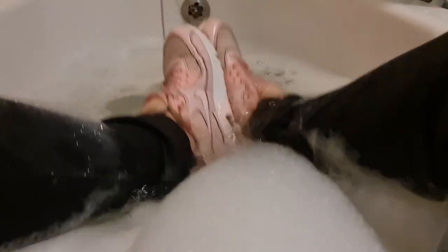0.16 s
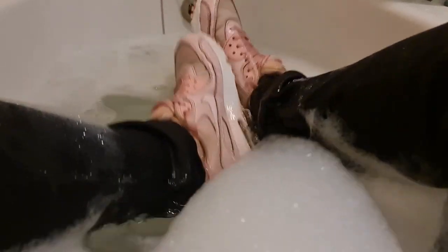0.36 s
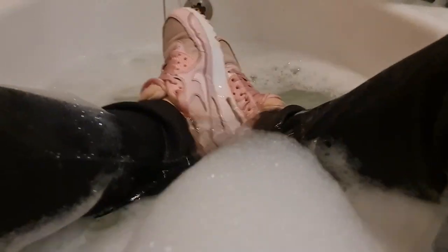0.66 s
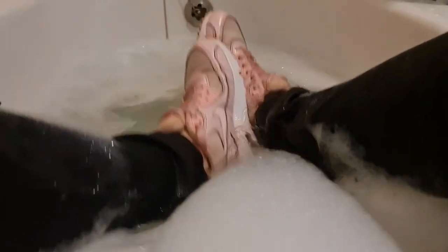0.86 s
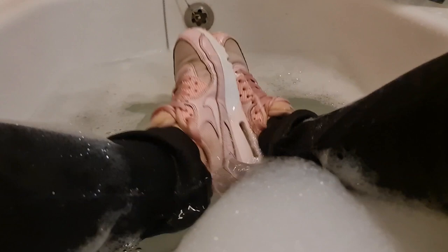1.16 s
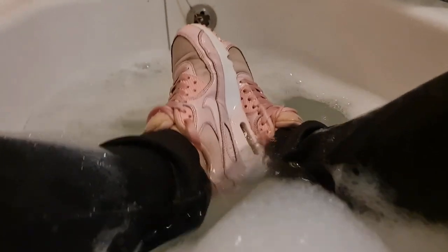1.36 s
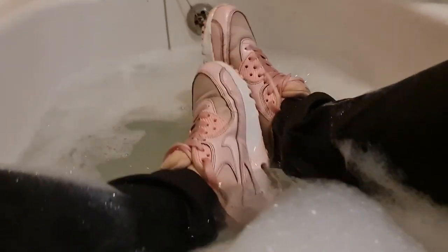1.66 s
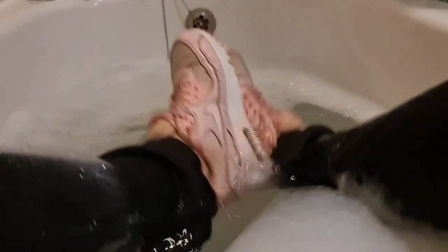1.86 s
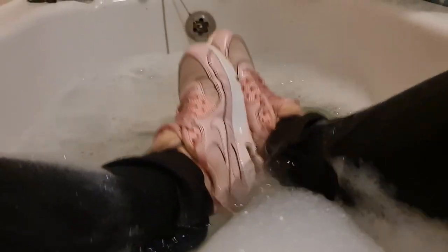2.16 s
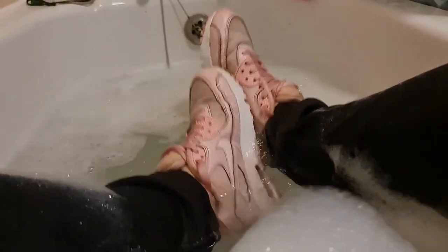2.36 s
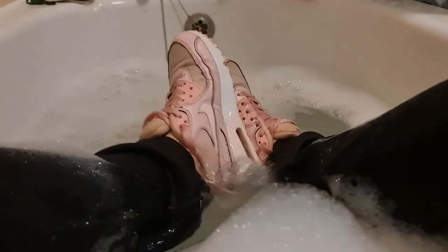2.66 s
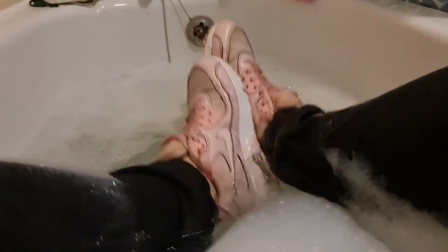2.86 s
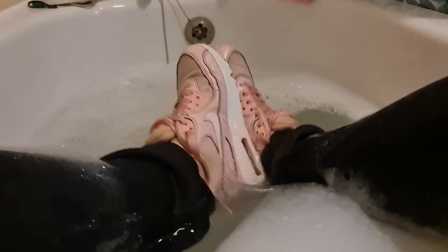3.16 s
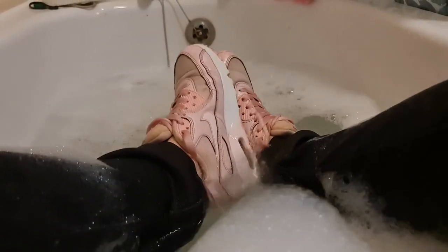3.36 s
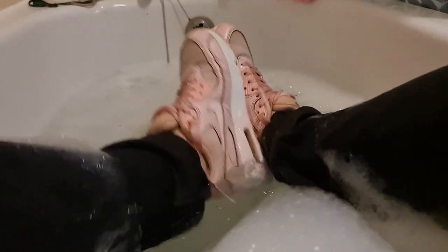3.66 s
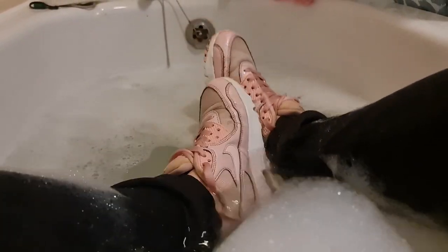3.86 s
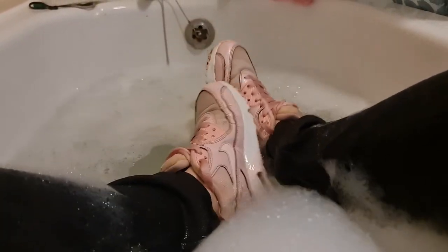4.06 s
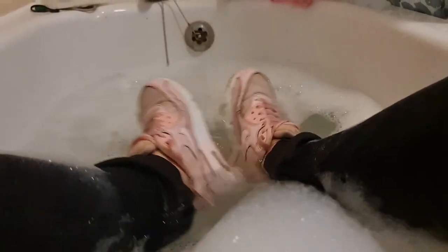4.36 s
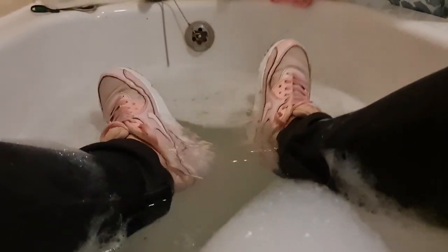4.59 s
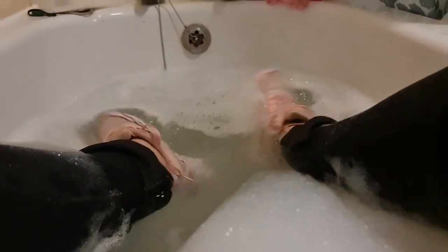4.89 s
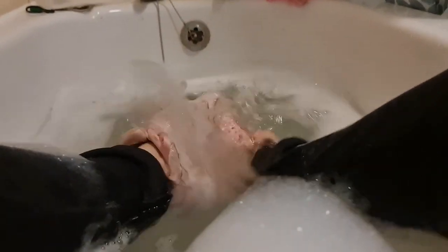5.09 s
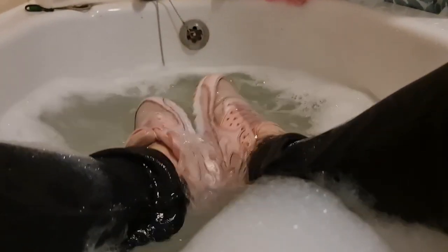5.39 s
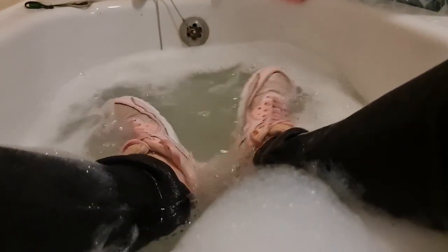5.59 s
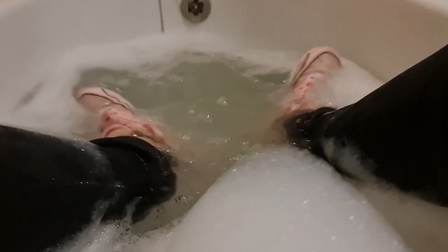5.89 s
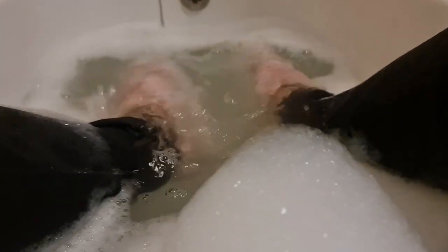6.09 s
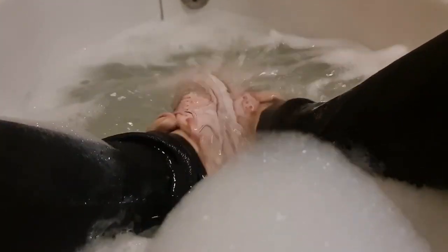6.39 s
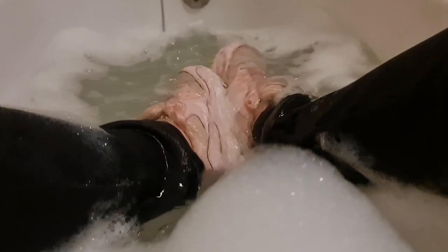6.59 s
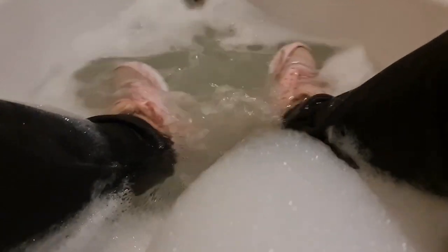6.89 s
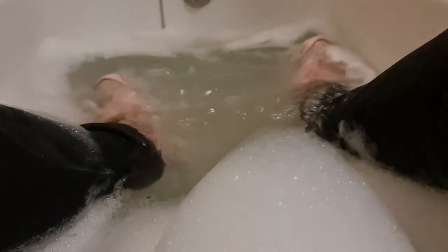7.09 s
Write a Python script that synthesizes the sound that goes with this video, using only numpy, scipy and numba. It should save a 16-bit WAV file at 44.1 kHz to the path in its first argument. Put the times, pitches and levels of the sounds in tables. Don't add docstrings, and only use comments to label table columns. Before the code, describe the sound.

Close up in a small tiled bathroom, wet rubber soles rub together in brief strokes, giving quick chirpy squeaks, gritty rubbing and fizzing foam over faint lapping. The squeaks fade after four seconds. After a near-quiet gap, feet push through the bathwater twice, with splashes, gurgling bubbles, crackling spray and dull low tub knocks. A nearby phone picks up a bright, slightly echoing sound with faint low rumble.

```python
import sys
import numpy as np
from scipy import signal
from scipy.fft import rfft, irfft, next_fast_len
from scipy.io import wavfile
from scipy.ndimage import uniform_filter1d
from numba import njit

SR = 44100
rng = np.random.default_rng(int(sys.argv[2]) if len(sys.argv) > 2 else 0)


def to_linear_factor(level_db):
    exponent = np.asarray(level_db, float) / 20
    return 10 ** exponent


def wrap_up_sound(samples):
    columns = np.atleast_2d(samples).T
    tamed = np.clip(columns, -1, 1)
    steps = np.round(tamed * 32767).astype(np.int16)
    wavfile.write(sys.argv[1], SR, steps)


N = 319284


def unit(x):
    return x / np.sqrt(np.mean(x ** 2))


def colour(x, points):
    hz, db = np.transpose(points)
    size = next_fast_len(x.shape[-1])
    f = np.maximum(np.arange(size // 2 + 1) * SR / size, 1)
    gain = to_linear_factor(np.interp(np.log(f), np.log(hz), db))
    return irfft(rfft(x, size) * gain, size)[..., :x.shape[-1]]


def walk(rate, size):
    hold = max(int(SR / rate), 2)
    levels = np.repeat(rng.standard_normal(size // hold + 1), hold)
    return 1.226 * uniform_filter1d(levels, hold)[:size]


@njit
def add_bubbles(out, start, hz, turns, size, glide, sr):
    for k in range(len(start)):
        fade = np.exp(-hz[k] / sr / turns[k])
        step = 2 * np.pi * hz[k] / sr
        phase = 0.
        level = size[k]
        count = int(6 * turns[k] * sr / hz[k])
        rise = (1 + glide) ** (2 / count)
        for i in range(start[k], min(start[k] + count, len(out))):
            out[i] += level * np.sin(phase)
            phase += step
            step = min(step * rise, 2.8)
            level *= fade


def swarm(rate, lo_hz, hi_hz, turns, spread_db, glide):
    when, pitch, bigness, ring = rng.random((int(rate * N / SR), 4)).T
    out = np.zeros(N)
    hz = lo_hz * (hi_hz / lo_hz) ** pitch
    size = to_linear_factor(-spread_db * np.log(1.02 - bigness)) * np.sqrt(hz / lo_hz)
    add_bubbles(out, (when * N).astype(np.int64), hz, turns * (.5 + ring), size, glide, 1. * SR)
    return unit(out)


def efforts(start, length, db, swell_db, attack, release):
    t = np.arange(0, N, 20)[:, None] / SR
    u = np.clip((t - start) / length, 0, 1)
    creep = np.minimum(t - start - attack, 0) / attack
    dying = np.maximum(t - start - length, 0) / release
    shape = np.exp(creep - dying)
    power = np.sum((shape * to_linear_factor(db - swell_db * (1 - u))) ** 2, axis=1)
    return np.interp(np.arange(N) / SR, t[:, 0], np.sqrt(power))


# start in seconds, length in seconds, last pitch in Hz,
# fundamental level in dB, second partial level in dB.
DIVES = [
    (.119, 0.014, 958, -32, -35.5),
    (.44, 0.027, 1420, -48, -52),
    (.611, .016, 1728, -44, -25),
    (.682, 0.011, 1418, -22, -30.5),
    (1.238, 0.04, 2250, -45, -43),
    (2.017, 0.015, 3280, -26.5, -42.5),
    (2.056, .011, 3190, -27.5, -50.5),
    (2.081, 0.008, 2040, -26.5, -27.5),
    (3.306, 0.033, 1356, -22.5, -35),
]
# the same five columns, in s, s, Hz, dB, dB.
SAGS = [(0, 0.0084, 1988, -23, -24), (.025, 0.024, 1740, -38, -31), (.05, 0.035, 1830, -38.5, -36.5),
        (.99, 0.055, 1604, -53, -86), (2.736, 0.017, 1790, -40, -37), (1.325, .045, 4130, -49, -73),
        (1.045, 0.025, 2700, -45.5, -46.5), (1.281, 0.063, 2163, -45.5, -43.5),
        (1.308, 0.049, 1618, -44.5, -62), (2.327, 0.011, 1455, -16.5, -32),
        (2.584, 0.018, 3000, -43.5, -33), (2.635, 0.015, 3756, -18.5, -43), (2.731, 0.012, 1358, -43, -30),
        (2.737, 0.01, 760, -31.5, -34.5), (3.05, 0.028, 1487, -54.5, -57), (3.95, 0.031, 1395, -48, -51),
        (1.262, .035, 2150, -44, -35.5), (1.275, .05, 2400, -41, -60)]
# the same five columns, in s, s, Hz,
# dB, dB.
HELD = [(.405, .013, 2305, -42.5, -58), (.624, 0.028, 1760, -37.5, -24.5), (.625, 0.053, 5400, -35, -56),
        (.702, 0.018, 1500, -32, -30.5), (1.058, 0.015, 2155, -49, -39.5), (1.938, 0.016, 2080, -43, -40.5),
        (1.954, 0.027, 1716, -35.5, -62), (1.695, 0.022, 1600, -50, -65),
        (1.702, 0.028, 2207, -44.5, -54.5), (1.738, 0.022, 3750, -47.5, -64),
        (1.945, 0.039, 6490, -34.5, -57.5), (2.0, 0.019, 2130, -59.5, -30.5),
        (2.064, 0.019, 1731, -63, -25), (2.055, .025, 5300, -32, -51.5), (2.305, 0.013, 2120, -35, -39),
        (2.357, 0.014, 1460, -22.5, -28), (2.374, .018, 1500, -34.5, -32), (2.606, 0.083, 2526, -40, -40.5),
        (2.646, 0.02, 1864, -27, -38.5), (2.656, 0.0076, 3850, -17.5, -45.5),
        (2.671, 0.016, 2480, -34, -34), (2.708, 0.022, 2700, -36, -42), (3.204, 0.026, 1500, -39.5, -66),
        (3.217, 0.033, 1112, -39.5, -51), (3.272, 0.028, 3850, -38, -45.5),
        (3.279, 0.0053, 2930, -34.5, -38.5), (3.29, .025, 5750, -31.5, -61), (3.364, 0.018, 2200, -36, -47),
        (3.937, .055, 4950, -49, -66.5), (3.286, 0.038, 1900, -27.5, -27), (3.916, 0.042, 2455, -50.5, -44),
        (4.28, 0.12, 5820, -67, -94),
        (0.656, 0.0246, 1770, -37, -27.5), (0.636, 0.039, 4290, -30, -60), (.7, 0.037, 4585, -33.5, -60),
          (0.689, 0.037, 5910, -41, -60), (2.662, 0.034, 3700, -27, -60), (4.78, 0.042, 1390, -67, -85),
          (2.375, .04, 2960, -34, -56), (.59, 0.013, 4500, -47, -70), (.602, 0.0072, 3500, -44, -68),
          (0.637, .008, 2500, -30.5, -60), (0.719, .03, 1500, -34, -35), (.76, .035, 4684, -54, -69.5),
          (1.082, 0.024, 1527, -51, -65), (1.742, .02, 2900, -54, -65), (1.813, 0.011, 3660, -48.5, -64),
          (1.938, .03, 3500, -47.5, -57), (1.959, 0.022, 5090, -41.5, -60), (2.265, .03, 1500, -54, -62),
          (2.399, 0.1, 718, -55.5, -69.5), (2.593, .03, 6270, -38, -60), (2.599, 0.028, 5275, -41, -63),
          (3.275, .03, 4750, -43.5, -65.5), (3.341, .03, 1390, -36.5, -37), (3.818, 0.046, 1560, -61, -74),
          (3.858, 0.0115, 1683, -42.5, -66), (3.88, 0.0288, 2435, -41.5, -43.5)]
# the same five columns, in s, s, Hz, dB, dB.
RISES = [(.291, 0.074, 1610, -51, -60), (.334, 0.014, 2300, -37.5, -53), (.35, 0.03, 2504, -42.5, -53.5),
         (.505, 0.0027, 3000, -33, -62), (.534, 0.025, 1746, -50, -48.5), (1.794, 0.027, 1530, -51, -58),
         (1.805, 0.017, 1916, -46, -50.5), (2.098, 0.012, 1483, -53, -30), (2.333, .007, 1914, -28, -33.5),
         (2.363, .009, 1882, -26, -36.5), (1.966, 0.0096, 2685, -42, -59.5),
         (3.222, .025, 2640, -40.5, -55), (3.352, 0.011, 2200, -32.5, -33),
         (2.946, 0.016, 2857, -43.5, -50), (3.088, 0.0082, 2165, -46.5, -57),
         (3.863, .018, 2457, -39.5, -38.5), (3.928, .008, 5140, -47, -62.5), (3.935, .008, 5840, -43, -65),
         (3.995, 0.016, 2940, -56, -70)]
# start in seconds, end in seconds.
FRAYED = ((.28, .56), (.98, 1.2), (1.69, 1.9), (2.26, 2.3), (2.58, 2.63), (2.37, 2.39), (2.658, 2.73),
           (3.94, 3.96))
DIVE, SAG, HOLD, RISE = 1.38, 1.13, 1, .84
SMEAR_RAD, WOBBLE, FRAYED_WOBBLE = .5, .022, .06
PARTIAL_FALL_DB, ROUGH_DB = -8, 3.5


def squeaks():
    out = np.zeros(N + SR)
    wobble, rough, uneven = walk(350, N + SR), walk(400, N + SR), walk(1500, N + SR)
    k = np.arange(1, 9)[:, None]
    for rows, glide in (DIVES, DIVE), (SAGS, SAG), (HELD, HOLD), (RISES, RISE):
        for s, length, last_hz, db, second_db in rows:
            i = int(max(s, 0) * SR)
            u = np.linspace(0, 1, max(int(length * SR), 16))
            now = slice(i, i + len(u))
            frayed = any(a < s < b for a, b in FRAYED)
            waver = FRAYED_WOBBLE if frayed else WOBBLE
            hz = last_hz * (1 + (glide - 1) * (1 - u) ** 1.6) * (1 + waver * wobble[now])
            smear = SMEAR_RAD * np.maximum(k - 1.6, 0) * uneven[now]
            phase = k * 2 * np.pi * np.cumsum(hz) / SR + smear
            partial_db = np.where(k == 1, db, second_db + PARTIAL_FALL_DB * (k - 2))
            gain = to_linear_factor(partial_db) * (k * hz < .45 * SR)
            shape = np.minimum(1, 5 * np.minimum(u, 1 - u)) * to_linear_factor(ROUGH_DB * rough[now])
            out[now] += 2 * shape * np.sum(gain * np.sin(phase), axis=0)
    return out[:N]


# start in seconds, length in seconds, slip level at the end in dB,
# swell over the stroke in dB, foam level in dB.
STROKES = [(-.01, 0.046, -30.5, -2, -36.5), (0.206, 0.16, -52.5, 8, -59), (0.377, 0.047, -50, 0.5, -50),
           (0.556, 0.036, -43, 11, -53), (0.621, 0.1, -32.5, 0, -39), (0.787, 0.028, -56, 12.5, -44.5),
           (0.87, 0.18, -52, 13, -86), (0.984, 0.11, -48.5, 14, -53.5), (1.228, 0.097, -41.5, 3.5, -46.5),
           (1.694, 0.14, -47.5, 4.5, -60.5), (1.942, 0.066, -33.5, 2, -34.5), (2.004, 0.088, -35.5, 1, -41),
           (2.318, 0.039, -25.5, 4, -34), (2.577, 0.093, -30, 5, -34.5), (2.645, 0.092, -26, 6.5, -37.5),
           (2.947, 0.033, -44.5, 1, -52), (3.021, 0.077, -40.5, 2, -45), (3.212, 0.068, -33.5, 1.5, -37),
           (3.283, 0.066, -27, 8.5, -40), (3.811, 0.066, -52, 15, -75.5), (3.861, 0.028, -50.5, 1, -47.5),
           (3.918, 0.023, -36, 4.5, -45), (4.3, 0.35, -76, -3.5, -93), (4.608, 0.061, -68, 6, -79)]
# frequency in Hz, level in dB per Hz.
RUB_COLOUR = [(600, -53.5), (1200, -4), (1600, 0), (2300, 1.5), (3800, 2), (6500, 10), (9000, 2.5),
              (14000, -6)]


def rubbing():
    s, length, slip_db, swell_db, foam_db = np.transpose(STROKES)
    slips = swarm(rate=1100, lo_hz=3000, hi_hz=7660, turns=9.5, spread_db=7.0, glide=-0.18)
    grit = swarm(rate=5000, lo_hz=1500, hi_hz=8350, turns=2.2, spread_db=10.0, glide=0.093)
    foam = swarm(rate=2600, lo_hz=8700, hi_hz=15800, turns=12.0, spread_db=7.5, glide=0.056)
    rub = to_linear_factor(-3.5) * slips + to_linear_factor(3.0) * unit(colour(grit, RUB_COLOUR))
    rub_press = efforts(s, length, slip_db, swell_db, attack=0.01, release=0.005)
    foam_press = efforts(s, length, foam_db, 1, attack=0.01, release=0.005)
    stutter = to_linear_factor(2 * (walk(110, N) - 0.24))
    return stutter * (rub_press * rub + foam_press * foam)


# start in seconds, length in seconds,
# slosh level in dB, splash level in dB, spray level in dB.
SURGES = [(4.923, 0.012, -68, -86, -53), (5.039, 0.1, -63, -61, -66.5), (5.146, 0.068, -53, -50.5, -59),
          (5.208, 0.05, -30.5, -35, -39.5), (5.276, 0.1, -40.5, -42, -50), (5.4, 0.055, -37.5, -42, -47.5),
          (5.496, 0.016, -37.5, -31, -35.5), (5.623, 0.038, -83, -44, -49.5),
          (5.789, 0.013, -56, -46, -55.5), (5.694, 0.053, -55.5, -53.5, -59),
          (5.851, 0.02, -51.5, -47, -60), (5.943, .14, -62.5, -66, -70.5), (6.09, 0.22, -51, -68.5, -71.5),
          (6.281, 0.04, -57, -50, -58), (6.299, 0.042, -59, -39, -49.5), (6.35, 0.088, -35, -33, -36),
          (6.357, 0.025, -57, -50, -35.5), (6.487, 0.13, -45, -39, -46.5), (6.61, 0.045, -34.5, -36, -37.5),
          (6.772, 0.023, -59, -33.5, -41), (6.853, 0.061, -50, -46.5, -50.5),
          (6.927, 0.11, -57, -42.5, -44.5), (7.106, 0.04, -44.5, -47, -46.5)]
# time in seconds, level in dB.
LAPPING = [(0.0, -46.5), (0.25, -60), (0.4, -49.5), (0.72, -75.5), (1.02, -53.5), (1.15, -61),
           (1.74, -57.5), (2.38, -64.5), (3.08, -57), (3.299, -75.5), (3.8, -65), (4.009, -58.5),
           (4.271, -66), (4.439, -59.5), (4.69, -66.5), (4.999, -66.5)]


def sweeps():
    s, length, slosh_db, splash_db, spray_db = np.transpose(SURGES)

    def push(db):
        return efforts(s, length, db, swell_db=0.5, attack=0.0064, release=0.027)

    slosh = swarm(rate=350, lo_hz=290, hi_hz=1300, turns=3.5, spread_db=4, glide=0.28)
    splash = swarm(rate=1300, lo_hz=1080, hi_hz=4100, turns=1.8, spread_db=6, glide=0.28)
    spray = swarm(rate=3500, lo_hz=3800, hi_hz=7200, turns=2, spread_db=6, glide=.15)
    mist = swarm(rate=4100, lo_hz=6950, hi_hz=16000, turns=0.5, spread_db=11.0, glide=0.029)
    lapping = to_linear_factor(np.interp(np.arange(N) / SR, *np.transpose(LAPPING), right=-120))
    surge = push(slosh_db) + lapping
    spatter = to_linear_factor(2.5 * (walk(120, N) - 0.28))
    thrown = push(splash_db) * splash + push(spray_db) * (spray + to_linear_factor(-5.5) * mist)
    return surge * slosh + spatter * thrown


# start in seconds, peak level in dB, pitch in Hz.
GURGLES = [(5.134, -41.5, 2600), (5.245, -24, 1004), (5.292, -29, 1426), (5.329, -34.5, 1270),
           (5.359, -30, 554), (5.428, -29.5, 1970), (5.454, -23.5, 1450), (5.473, -27.5, 1796),
           (5.989, -46, 1110), (6.356, -32, 1260), (6.383, -22, 2560), (6.41, -26, 2690), (6.429, -33, 610),
           (6.47, -27, 2440), (6.521, -28, 1010), (6.545, -38, 3080), (6.589, -26, 640),
           (6.645, -23.5, 924), (6.668, -32, 560), (6.702, -32, 1220), (6.809, -26, 1975),
           (6.858, -31.5, 1430), (6.901, -38, 2780)]
# start in seconds, peak level in dB, pitch in Hz.
BURBLES = [(1.61, -50, 1105), (5.193, -37, 2260), (5.22, -33, 453), (5.255, -36, 700), (5.403, -35, 2840),
           (5.415, -38, 2870), (5.545, -35, 3300), (5.658, -34.5, 790), (5.664, -40, 3180),
           (5.676, -34, 1180), (5.717, -37, 955), (5.719, -33, 1294), (5.755, -41, 1340),
           (5.772, -43, 1910), (5.796, -28.5, 758), (6.287, -46, 1290), (6.373, -34, 1320),
           (6.366, -19, 5330), (6.376, -24, 5550), (6.384, -31, 5080), (6.393, -28.5, 5550),
           (6.402, -26, 616), (6.44, -33, 694), (6.508, -39, 1080), (6.535, -38, 1104), (6.571, -33, 1110),
           (6.6, -32, 706), (6.635, -28, 800), (6.645, -32, 3270), (6.755, -36, 1940), (6.868, -39, 1610),
           (6.883, -48, 3800), (6.997, -48, 1310), (7.035, -44, 1120), (7.075, -39, 2100),
           (7.157, -44, 500), (7.185, -45, 2430)]
GURGLE_RING_S, BURBLE_RING_S, GURGLE_GLIDE = 0.0028, 0.0047, .13


def gurgles():
    out = np.zeros(N)
    for rows, ring in (GURGLES, GURGLE_RING_S), (BURBLES, BURBLE_RING_S):
        s, db, hz = np.transpose(rows)
        start, turns = (s * SR).astype(np.int64), 1 + hz * ring
        add_bubbles(out, start, hz, turns, to_linear_factor(db + 7), GURGLE_GLIDE, 1. * SR)
        short_glide = (1 + GURGLE_GLIDE) ** .25 - 1
        add_bubbles(out, start, hz, turns / 4, -to_linear_factor(db + 5), short_glide, 1. * SR)
    return out


# start in seconds, peak level in dB, pitch in Hz.
POPS = [(0.127, -31, 1800), (.192, -35, 950), (0.2712, -33, 1880), (.376, -33.5, 580), (0.3973, -39, 12100),
        (.51, -35.5, 2500), (0.8117, -33, 12000), (.9283, -61, 10900), (0.9888, -52, 6000),
        (1.233, -42.5, 730), (1.538, -56, 850), (1.562, -33, 900), (1.674, -41, 615), (2.105, -38, 1500),
        (2.2964, -32, 4970), (2.741, -36, 920), (3.0744, -41.5, 8940), (4.2178, -59, 9960),
        (4.9285, -42, 5200), (4.9362, -56, 4990), (5.5052, -21, 3190), (5.516, -29, 2505),
        (5.529, -32, 1500), (5.8573, -36, 2465), (5.9866, -43.5, 3250), (6.2749, -44, 2400),
        (6.309, -37, 4000), (6.3645, -19, 5370), (6.38, -26, 6010), (6.628, -28.5, 6300), (6.65, -20, 3140),
        (6.833, -29, 1500), (6.9457, -28.5, 3000), (7.1255, -32, 3510), (5.247, -26, 2500),
        (5.257, -29, 1500), (6.42, -25, 3500), (6.573, -32, 1500), (3.695, -58, 6000), (5.866, -38, 1600),
        (6.955, -34, 5000), (6.99, -37, 5500), (5.2215, -28, 490)]


def pops():
    s, db, hz = np.transpose(POPS)
    out = np.zeros(N)
    add_bubbles(out, (s * SR).astype(np.int64), hz, 0.85 + 0 * s, to_linear_factor(db + 2), .1, 1. * SR)
    return out


# start in seconds, peak level in dB, pitch in Hz.
DRIPS = [
    (0.329, -40.5, 1380),
    (0.62, -30.5, 1120),
    (1.619, -48, 640),
    (1.886, -40.5, 1280),
    (5.502, -23, 1004),
    (5.526, -26.5, 1340),
    (5.857, -38.5, 1090),
    (6.576, -27, 840),
    (7.127, -36, 960),
]
# start in seconds, peak level in dB, pitch in Hz.
SPITS = [(5.2083, -28, 3290), (5.5162, -19, 3770), (5.5732, -28.5, 2320), (5.6735, -34.5, 2400),
         (5.677, -31, 5440), (6.6258, -25.5, 1850), (6.7446, -31.5, 2000), (6.783, -31, 1470),
         (6.789, -29.5, 1330), (6.797, -30.5, 2020), (6.8323, -27, 1690), (7.126, -39, 2475)]
# start in seconds, end in seconds.
CALM = ((1.6, 1.65), (5.55, 5.85))


def drips():
    s, db, hz = np.transpose(DRIPS + SPITS)
    out, start = np.zeros(N), (s * SR).astype(np.int64)
    turns = np.where(s < 5, 1.1, 1.13 + hz / 1200)
    for first, last in CALM:
        turns[(s > first) & (s < last)] = 5.4
    add_bubbles(out, start, hz, turns, to_linear_factor(db + 6.5), .12, 1. * SR)
    add_bubbles(out, start, 2500 + 0 * s, 0.25 + 0 * s, to_linear_factor(db - 23.5), .1, 1. * SR)
    return out


# start in seconds, blow level in dB, contact time in seconds.
KNOCKS = [(5.188, -42, 0.0015), (5.203, -28, 0.0041), (5.226, -28.5, 0.0016), (5.25, -37, 0.0066),
          (6.104, -31.5, 0.0039), (6.121, -31.5, 0.0036), (6.147, -26.5, 0.0065), (6.189, -37.5, 0.0044),
          (6.393, -34.5, 0.0027), (6.415, -49, 0.0029), (6.62, -40.5, 0.0013)]
# frequency in Hz, level in dB, 60 dB decay time in seconds.
TUB = [(95.5, -8, 0.36), (126, 0, 0.25), (207.3, -3, 0.5), (312, -20, 0.22), (385, -37, .25),
       (560, -36, .25)]


def tub():
    t, push = np.arange(SR // 2) / SR, np.zeros(N)
    for s, db, contact in KNOCKS:
        blow = np.hanning(max(int(contact * SR), 8))
        i = int(s * SR)
        push[i:i + len(blow)] += to_linear_factor(db) * blow / blow.sum()
    ring = np.zeros(len(t))
    for hz, db, t60 in TUB:
        ring += to_linear_factor(db) * np.sin(2 * np.pi * hz * t) * 1000 ** (-t / t60)
    radiation = signal.butter(2, 50, "high", fs=SR, output="sos")
    return signal.sosfilt(radiation, signal.fftconvolve(push, ring)[:N])


# frequency in Hz, 60 dB decay time in seconds.
TILES = [(200, 0.35), (1500, 0.34), (5000, 0.41), (12000, 0.37)]
TUB_ECHO_DB, TUB_ECHO_S = 4, 0.013


def bathroom(x, left_db, direct_db, lag):
    size = int(.6 * SR)
    hz, t60 = np.transpose(TILES)
    f, t, cells = signal.stft(rng.standard_normal((2, size)), SR, nperseg=256)
    cells = cells * np.exp(-np.log(1000) * t / np.interp(f, hz, t60)[:, None])
    age = np.arange(size) / SR
    build_up = np.minimum(1, age / 0.0071)
    tub_echo = 1 + to_linear_factor(TUB_ECHO_DB) * np.exp(-age / TUB_ECHO_S)
    tail = signal.istft(cells, SR)[1][:, :size] * build_up * tub_echo
    lines = rfft(tail)
    lines = lines / np.sqrt(uniform_filter1d(np.abs(lines) ** 2, size=61))
    alike = 1 / (1 + (np.arange(lines.shape[1]) * SR / size / 200) ** 4)
    lines[0] = alike * lines[1] + np.sqrt(1 - alike ** 2) * lines[0]
    tail = irfft(lines, size) * (age < .5)
    tail[0, 0] += to_linear_factor(direct_db)
    tail[1, lag] += to_linear_factor(direct_db)
    return signal.fftconvolve(x[None], tail, axes=1)[:, :N] * to_linear_factor([[left_db / 2], [-left_db / 2]])


# frequency in Hz, level in dB per Hz.
HOUSE = [(15, -6.5), (28, 1), (42, -11.5), (85, 6.5), (125, -3.5), (230, -8.5), (280, -18.5), (520, -25),
         (1500, -26), (5500, -33.5), (8000, -39.5), (16000, -49)]
HOUSE_DB, HUM_HZ, HUM_DB = -55, 28.4, -68


def house():
    mid, side = colour(rng.standard_normal((2, N)), HOUSE)
    side = colour(side, [(40, -1.5), (120, -21.0), (250, 1.0), (16000, 2.5)])
    scale = to_linear_factor(HOUSE_DB + 0.5 * walk(3.1, N)) / np.sqrt(np.mean(mid ** 2))
    hum = np.sqrt(2) * to_linear_factor(HUM_DB) * np.sin(2 * np.pi * HUM_HZ * np.arange(N) / SR)
    return scale * (mid + side * np.array([[1], [-1]])) + hum * np.array([[.8], [1.2]])


def scene():
    knock = tub()
    shoes = to_linear_factor(-3.5) * bathroom(squeaks(), -2.5, -2.5, lag=26)
    shoes = shoes + bathroom(rubbing(), -1.7, -11.5, lag=12)
    water = bathroom(sweeps() + knock / 2, 0.27, -3.0, lag=8)
    water = water + to_linear_factor(-1.5) * bathroom(drips(), -0.27, -0.78, lag=3)
    water = water + to_linear_factor(-4.5) * bathroom(gurgles(), -0.3, -1, lag=5)
    foam = bathroom(pops(), 0.3, 4.1, lag=3)
    return shoes + water + foam + knock + house()


# frequency in Hz, level in dB.
PHONE = [(300, -3), (1000, -2.5), (2000, 1), (3500, 0.5), (5500, 0.5), (7500, -2), (11000, 2.5),
         (15000, -5)]


def roll_off(x):
    return signal.sosfilt(signal.butter(12, 15890, fs=SR, output="sos"), x)


# frequency in Hz, level in dB.
PHONE = [(300, -3), (1000, -2.5), (2000, 1), (3500, 0.5), (5500, 0.5), (7500, -2), (11000, 2.5),
         (15000, -5)]


def record(dry):
    top_cut = signal.ellip(8, .2, 70, 15900, fs=SR, output="sos")
    mix = signal.sosfilt(top_cut, colour(dry, PHONE))
    return roll_off(mix)


dry = scene()
out = record(dry)
wrap_up_sound(out)
```